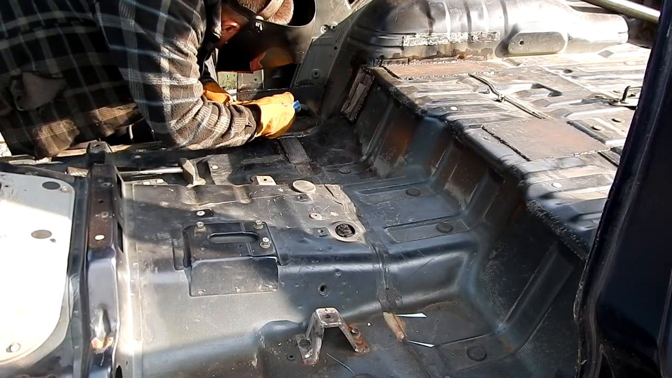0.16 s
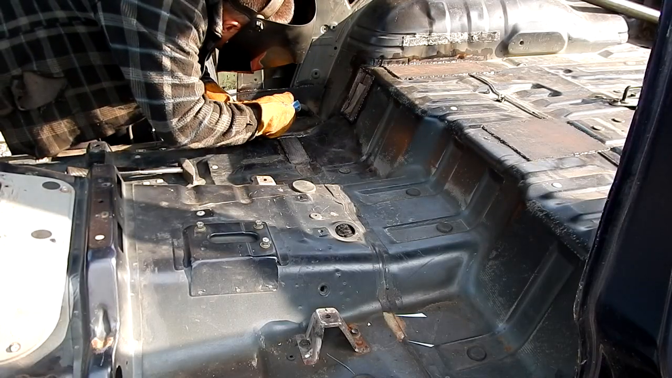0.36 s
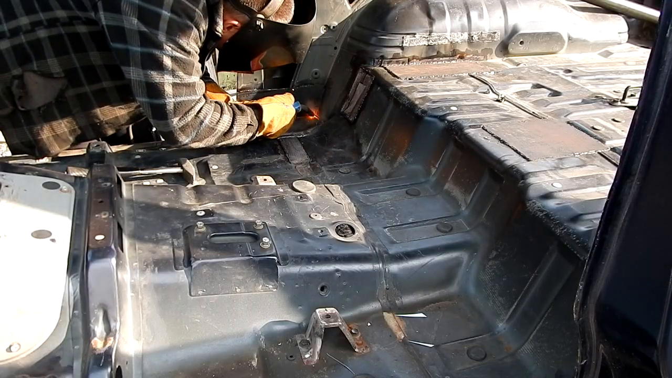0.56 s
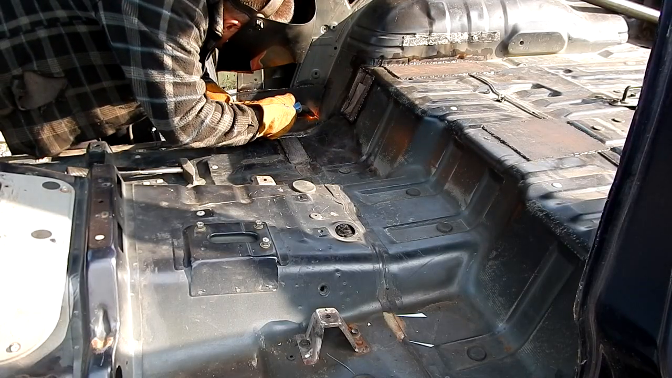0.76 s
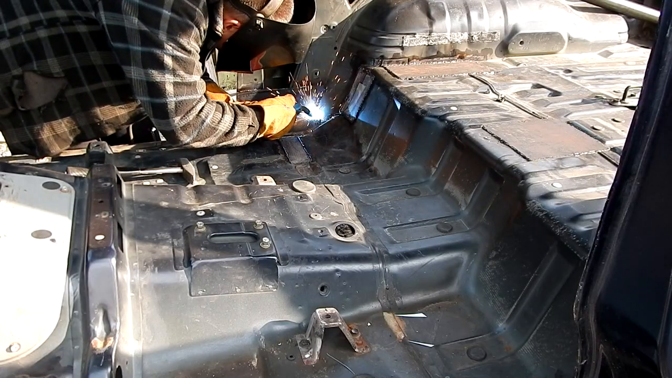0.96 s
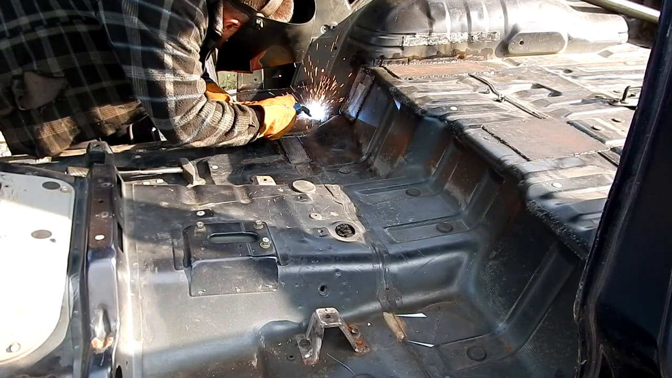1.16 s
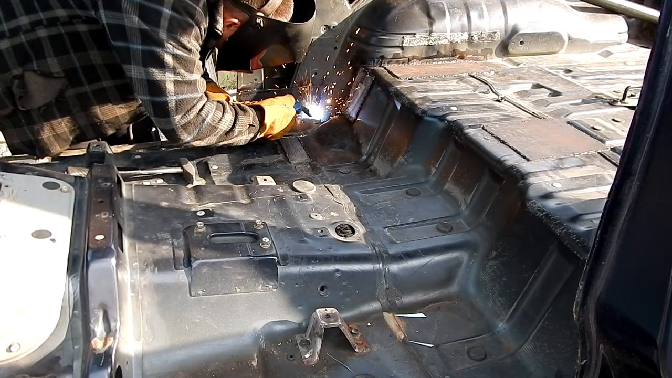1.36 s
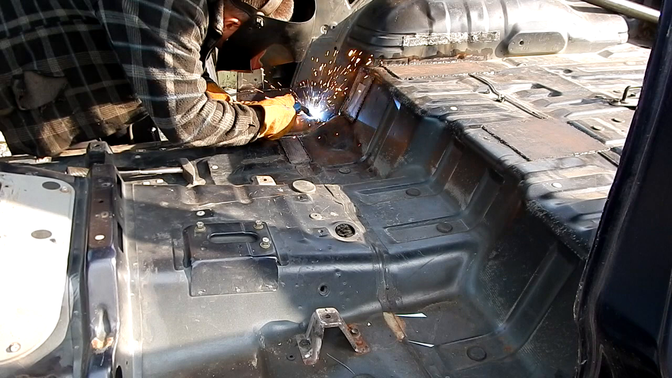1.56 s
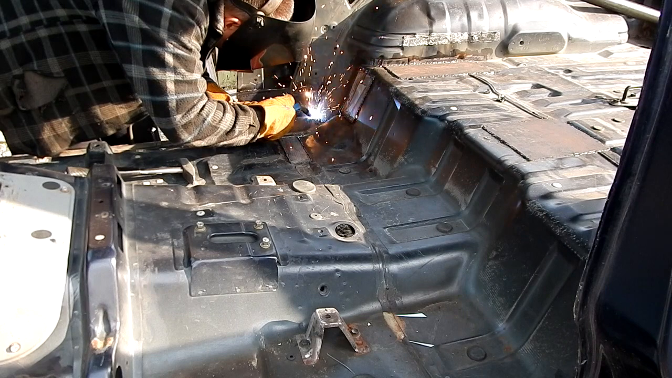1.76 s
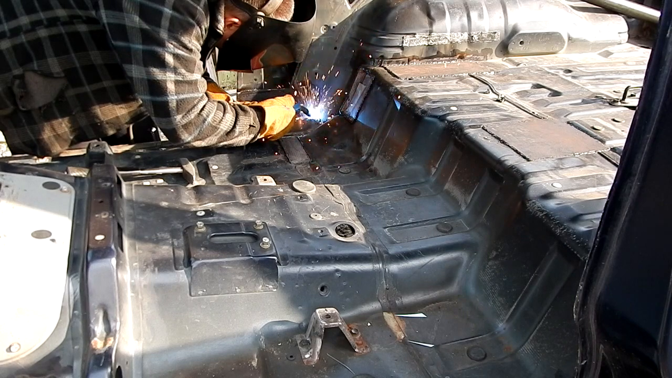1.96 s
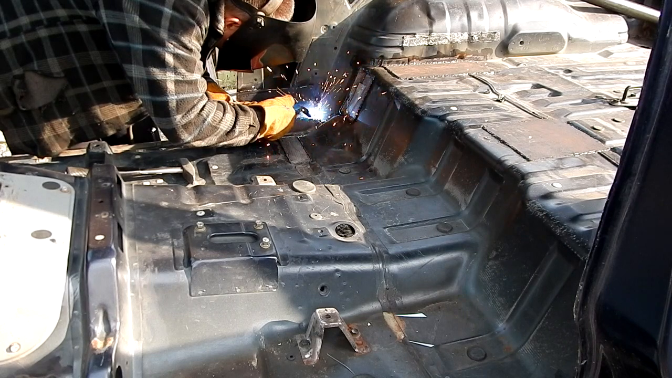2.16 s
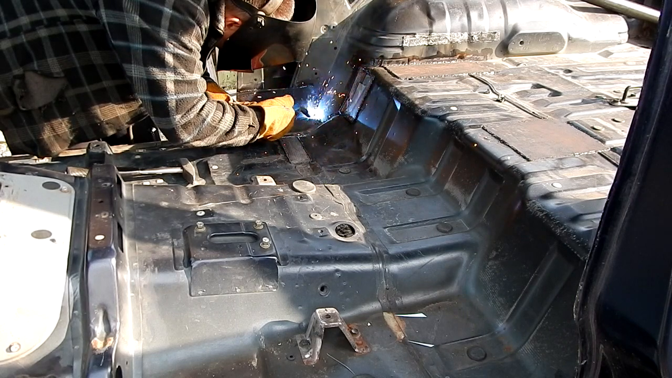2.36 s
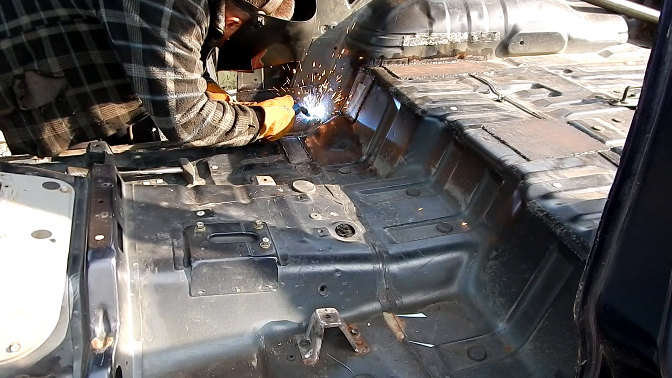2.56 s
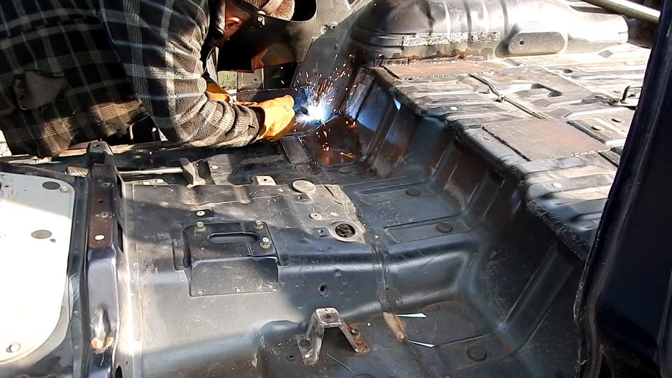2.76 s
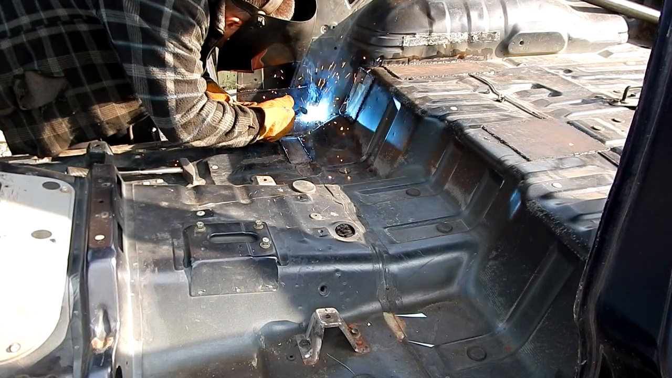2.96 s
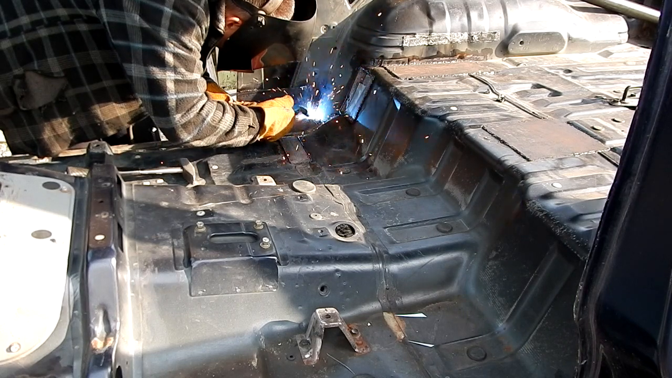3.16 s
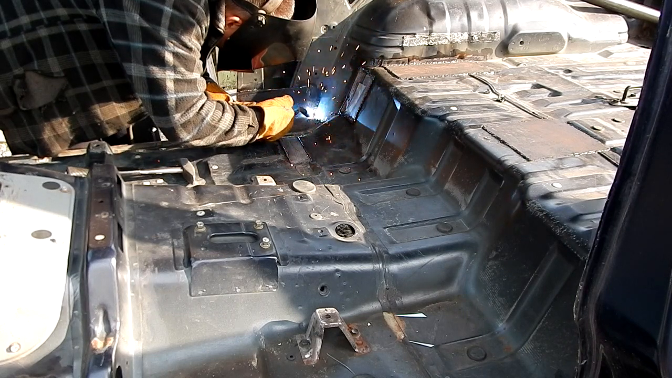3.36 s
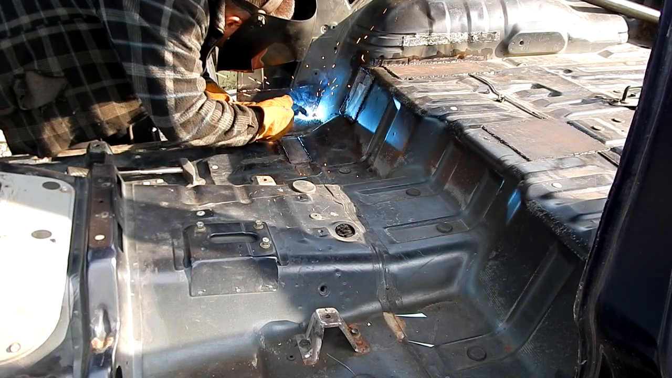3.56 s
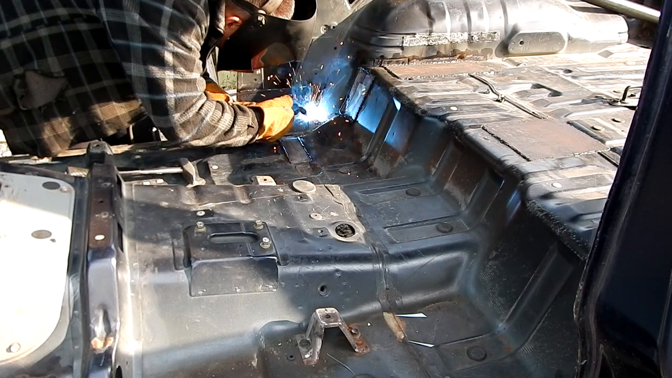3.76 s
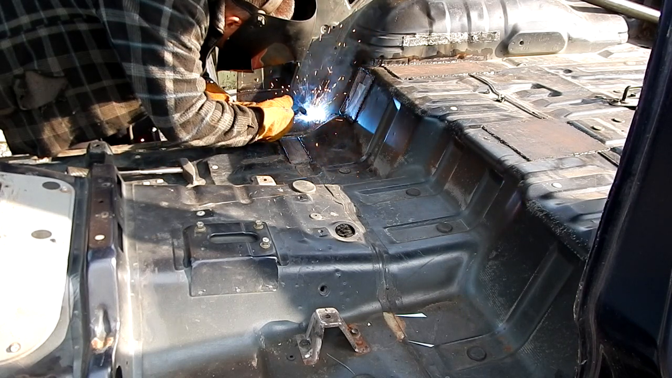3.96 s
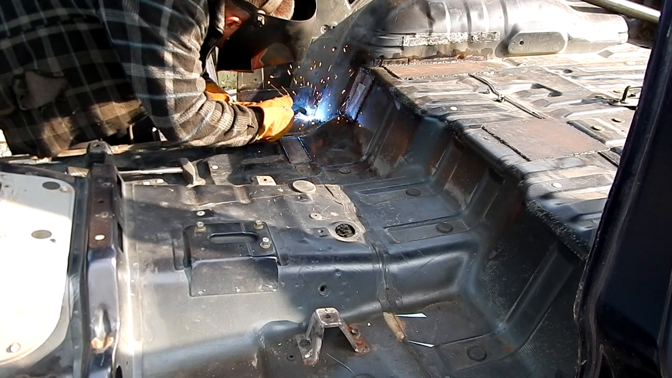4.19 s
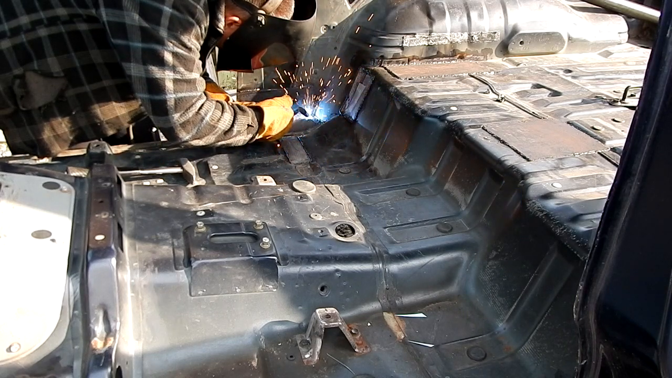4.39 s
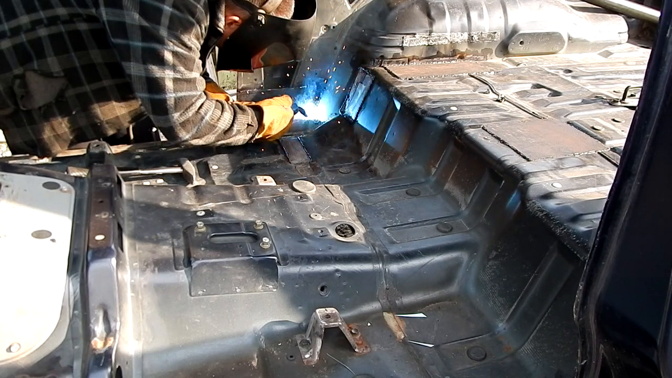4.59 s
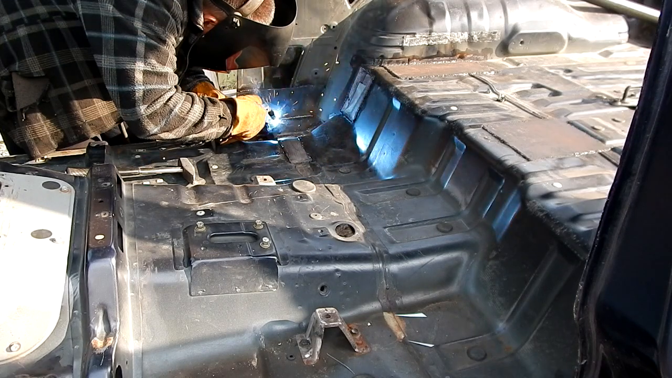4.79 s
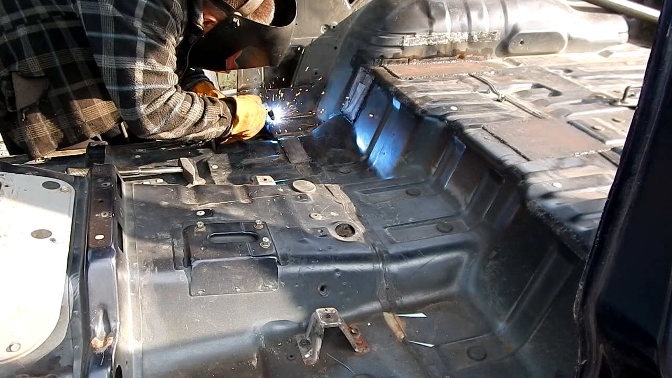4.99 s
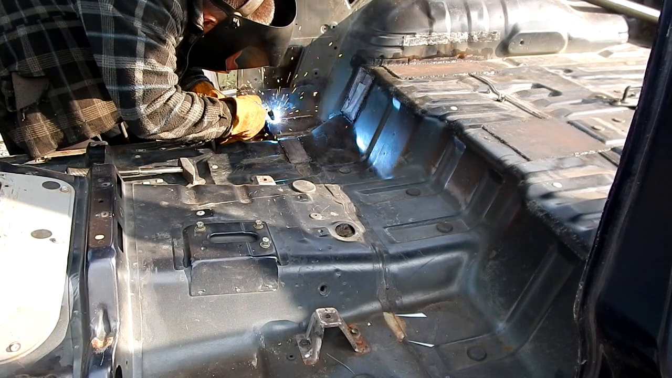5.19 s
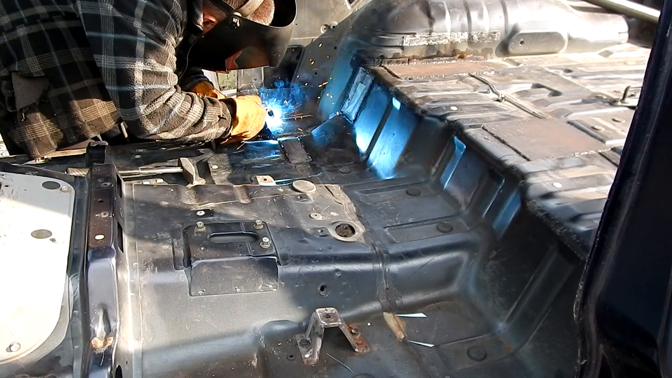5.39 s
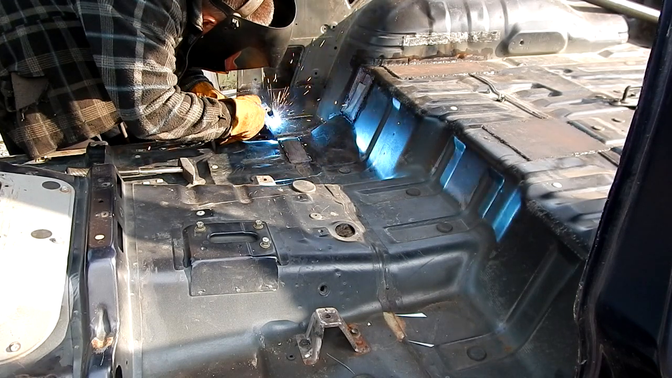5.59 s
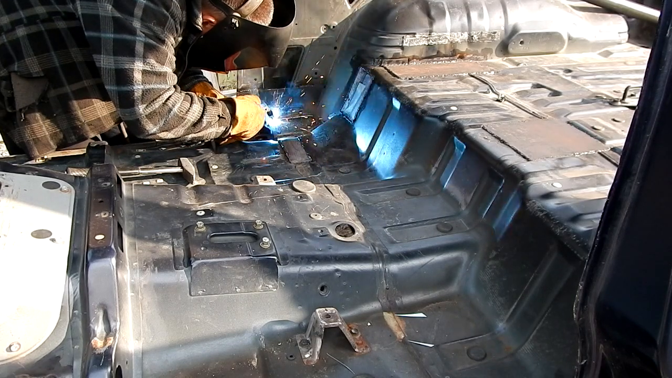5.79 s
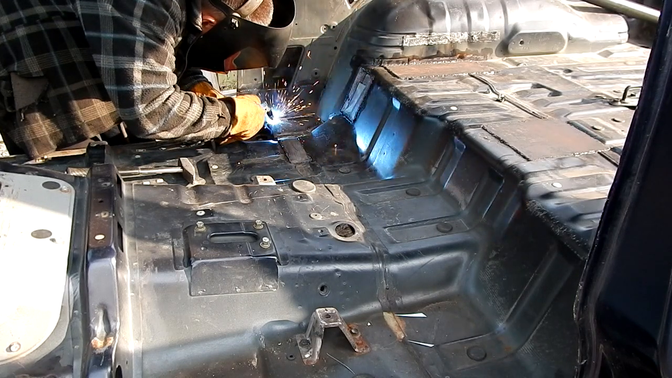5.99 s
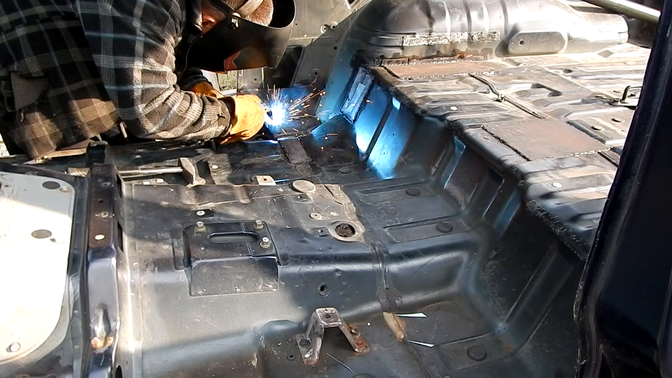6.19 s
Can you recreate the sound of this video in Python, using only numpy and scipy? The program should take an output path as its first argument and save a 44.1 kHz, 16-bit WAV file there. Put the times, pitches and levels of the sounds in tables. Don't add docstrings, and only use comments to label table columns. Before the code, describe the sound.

In a bare metal vehicle shell, cloth rubs and a jolted panel hums softly, then a hard trigger clack releases hissing gas. About a second in, a welding arc catches with fat sharp pops, settling into dense uneven crackle with brief stalls and fine spatter ticks. Near the end an abrupt cut brings a thinner, brighter, more ringing second pass. Close stereo microphone, about two metres away, short metallic reflections.

```python
import sys
import numpy as np
from scipy import signal
from scipy.fft import rfft, irfft
from scipy.io import wavfile
from scipy.ndimage import uniform_filter1d

SR = 44100
rng = np.random.default_rng(int(sys.argv[2]) if len(sys.argv) > 2 else 0)


def int16_out(signal):
    q = np.round(np.clip(np.atleast_2d(signal).T, -1, 1) * 32767)
    wavfile.write(sys.argv[1], SR, q.astype(np.int16))


def ratio(d):
    e = np.asarray(d, float) / 20
    return 10 ** e


N = 275184
T = np.arange(N) / SR
CUT_S = 4.703
STRIKE_S, SETTLES_S = .966, 1.17


def curve(rows, column=1):
    rows = np.array(rows)
    return np.interp(T, rows[:, 0], rows[:, column])


def colour(x, points, size=4096):
    hz, db = np.transpose(points)
    bins_hz = np.arange(size // 2 + 1) * SR / size
    gain = ratio(np.interp(np.log(bins_hz + 1), np.log(hz), db))
    cepstrum = irfft(np.log(gain / np.sqrt(np.mean(gain ** 2))))
    cepstrum[1:size // 2] *= 2
    cepstrum[size // 2 + 1:] = 0
    response = irfft(np.exp(rfft(cepstrum)))
    return signal.fftconvolve(x, response)[:len(x)]


def band(x, hz, width_hz):
    return signal.lfilter(*signal.iirpeak(hz, hz / width_hz, fs=SR), x)


def unit(x):
    return x / np.sqrt(np.mean(x ** 2))


def stereo(mid, side):
    return np.array([mid + side, mid - side])


def hiss(points, apart):
    mid, side = (unit(colour(rng.standard_normal(N), points)) for _ in range(2))
    return stereo(mid, apart * side)


def clicks(times, db):
    return np.bincount(np.minimum((times * SR).astype(int), N - 1), ratio(db), N)


# [t/s, level/dB]
SHOP_LEVEL = [(0, -54), (.5, -55.5), (.56, -67), (1, -68), (6.24, -82.5)]
# [f/Hz, level/dB per Hz]
SHOP_COLOUR = [(200, -11), (300, -7), (450, -22), (2200, -26), (2550, -32), (4200, -27), (4750, -21),
               (5300, -28), (7500, -41.5), (8600, -29), (9500, -48), (12800, -55), (13500, -82)]


def shop_air():
    return ratio(curve(SHOP_LEVEL)) * hiss(SHOP_COLOUR, 0.35)


# [t/s, level/dB]
RUMBLE_LEVEL = [(0, -70), (.12, -53), (.26, -65), (.45, -64), (.58, -74), (1.2, -74), (6.24, -66.5)]
# [f/Hz, level/dB per Hz]
RUMBLE_COLOUR = [(12, -36), (20, -51), (49, -9), (140, -0.5), (201, 1.5), (338, -13), (398, -9), (700, -9),
                 (910, -27), (1540, -120)]


def rumble():
    lumps = ratio(2.5 * unit(uniform_filter1d(rng.standard_normal(N), 1500)))
    return lumps * ratio(curve(RUMBLE_LEVEL)) * hiss(RUMBLE_COLOUR, .45)


# [t/s, level/dB]
GAS_LEVEL = [(0, -100), (.5, -76), (.56, -56.5), (.9, -51), (1.15, -59.5), (6.24, -76)]
# [f/Hz, level/dB per Hz]
GAS_COLOUR = [(300, -34), (1030, -21.5), (1570, -7.5), (2000, -15.5), (2550, -17), (3300, -27), (4500, -13),
              (5100, -13), (5900, -17), (7500, -36), (8600, -29), (9500, -46), (12800, -51), (13500, -90)]


def shielding_gas():
    return ratio(curve(GAS_LEVEL)) * hiss(GAS_COLOUR, 0.17)


# [t/s, f/Hz, level/dB]
PANEL_HUM = [
    (0.0, 331.3, -60.5),
    (0.16, 354, -53.5),
    (0.3, 324, -65),
]


def panel():
    level = ratio(curve(PANEL_HUM, column=2) + 7) * (T < PANEL_HUM[-1][0])
    return level * np.sin(2 * np.pi * np.cumsum(curve(PANEL_HUM)) / SR)


# [t/s, rms level/dB, t60/s, centre f/Hz, width f/Hz]
CLOTH = [
    (0.018, -52, 0.18, 4600, 3300),
    (0.047, -42.5, 0.27, 310, 330),
    (0.049, -45, 0.2, 1760, 900),
    (0.051, -48, 0.17, 5100, 2500),
    (0.472, -43.5, 0.13, 230, 130),
    (0.476, -38, .2, 5400, 4000),
    (0.478, -40, 0.24, 1450, 1900),
]
# [t/s, rms level/dB, t60/s, centre f/Hz, width f/Hz]
CLACKING = [
    (0.488, -34, 0.09, 5700, 2500),
    (.5194, -20, 0.016, 2100, 7100),
    (.5195, -33, 0.11, 6500, 3200),
    (.5196, -24, 0.07, 1600, 1100),
    (.5197, -23, 0.11, 4580, 1200),
    (.92, -35, 0.07, 1100, 1800),
    (0.921, -36, 0.12, 5200, 4500),
    (1.083, -40, .1, 5000, 4600),
    (1.158, -47, .08, 5500, 4600),
]


def scuffs():
    count = N // 4
    out = np.zeros((2, count))
    for rows, attack_s in ((CLOTH, 0.0055), (CLACKING, 0.00034)):
        for s, db, t60, hz, width_hz in rows:
            t = np.maximum(T[:count] - s, 0)
            noise = rng.standard_normal((2, count))
            mid, side = unit(band(band(noise, hz, width_hz), hz, width_hz))
            apart = min(hz / 9000, .8)
            shape = ratio(db - 60 * t / t60) * np.minimum(t / attack_s, 1)
            out += shape * stereo(mid, apart * side)
    return np.pad(out, ((0, 0), (0, N - count)))


# [t/s, peak level/dB]
GAS_BLASTS = [(0.952, -57), (1.18, -59), (1.357, -60), (1.554, -59), (1.81, -63), (1.983, -63),
              (2.182, -60), (2.44, -65), (2.818, -59), (3.073, -61), (3.742, -58), (5.481, -57),
              (5.606, -59)]


def blasts():
    s, db = np.transpose(GAS_BLASTS)
    lag_s = .011
    t = T[:SR // 10]
    push = np.exp(-t / .0022) * np.sin(2 * np.pi * 190 * t)
    return ratio(16.0) * signal.fftconvolve(clicks(s + lag_s, db), push)[:N]


def shell(echoes, modes, ring_db):
    t = T[:SR // 4]
    samples = np.arange(len(t))
    response = np.zeros((2, len(t)))
    for ms, mid, side in echoes:
        nearby = abs(t - ms / 1000) < .001
        image = np.sinc(samples - 8 - ms * SR / 1000) * nearby
        response += np.outer([mid, side], image)
    for hz, width_hz, db in modes:
        decay = np.exp(-np.pi * width_hz * t)
        phase = rng.random((2, 1))
        response += ratio(db + ring_db) * decay * np.sin(2 * np.pi * (hz * t + phase))
    return response


def tail(db, t60, count):
    t = T[:SR // 4]
    noise = rng.standard_normal((count, 2, len(t))) * np.clip(t / 0.0005, 0, 1)
    noise = signal.lfilter(*signal.butter(1, 11000, fs=SR), noise)
    lows = signal.lfilter(*signal.butter(2, 2600, fs=SR), noise)
    highs = noise - lows
    return ratio(db - 60 * t / t60) * highs + ratio(db - 4 - 60 * t / (.7 * t60)) * lows


# [t/s, peak level/dB]
FIRST_PASS = [(0.9657, -10), (0.9792, -12.5), (0.9855, -8.5), (0.9988, -12.5), (1.025, -16),
              (1.0328, -13.5), (1.099, -14), (1.1751, -10.5), (1.1936, -9), (1.2198, -12), (1.2816, -15),
              (1.3685, -12), (1.3782, -11.5), (1.4164, -14), (1.4514, -18.5), (1.4735, -18), (1.5053, -18),
              (1.5688, -12.5), (1.5803, -15.5), (1.5909, -15), (1.6653, -15), (1.7045, -16),
              (1.7827, -17.5), (1.8232, -13), (1.8366, -14.5), (1.9101, -11.5), (1.9961, -13.5),
              (2.1025, -18), (2.1431, -13.5), (2.1957, -11),
              (2.381, -19), (2.3988, -17), (2.4526, -10), (2.4648, -12), (2.481, -16), (2.534, -16),
             (2.5461, -11.5), (2.5943, -13.0), (2.6827, -13.5), (2.7064, -16.5), (2.7488, -17.5),
             (2.8225, -14), (2.8328, -15), (2.9339, -17), (2.941, -14.5), (2.953, -11.5), (2.9975, -14),
             (3.0297, -25.5), (3.0541, -17), (3.0866, -12), (3.1571, -15), (3.1746, -14.5), (3.312, -16),
             (3.4514, -13.5), (3.4597, -11.5), (3.4848, -15.5), (3.531, -19), (3.5533, -16.5),
             (3.574, -14.5), (3.7547, -12.5),
              (3.865, -14.5), (3.936, -20), (3.9466, -16.0), (3.974, -16.5), (4.0396, -12), (4.059, -14.5),
               (4.109, -15.5), (4.1231, -20), (4.13, -10.5), (4.1734, -17), (4.1793, -18), (4.1864, -17.0),
               (4.198, -13.5), (4.2042, -13.5), (4.2226, -13.5), (4.2421, -20), (4.2752, -20.5),
               (4.3102, -16), (4.3206, -13.5), (4.3566, -17.5), (4.3659, -17), (4.386, -15), (4.402, -16),
               (4.4242, -12.5), (4.466, -14), (4.5087, -15.5), (4.5372, -14), (4.5874, -13),
               (4.6052, -13.5), (4.6538, -14)]
# [t/s, peak level/dB]
SECOND_PASS = [(4.7848, -18), (4.8956, -17.5), (4.9852, -19.0), (4.9932, -15.5), (5.0738, -32),
               (5.118, -13), (5.15, -14), (5.168, -17.0), (5.193, -15), (5.2046, -18), (5.2119, -15),
               (5.2318, -17.0), (5.2611, -19.5), (5.3094, -16.5), (5.3532, -18), (5.3593, -13),
               (5.3735, -14.5), (5.4092, -19.5), (5.4682, -15.5), (5.492, -12), (5.5163, -18),
               (5.619, -12.0), (5.7141, -14), (5.8127, -13.5), (6.0837, -15.5), (6.1219, -11.5),
               (6.15, -20), (6.1729, -14), (6.1904, -20), (6.2151, -21.5)]
# [t/s, peak level/dB]
BOUNCES = [
    (2.1975, -16.5),
    (6.12, -16),
]
# [t/s, length/s]
WIRE_STICKS = [(1.032, 0.067), (1.099, 0.076), (1.281, 0.043), (1.473, 0.032), (1.505, 0.033),
               (1.633, 0.032), (1.857, 0.029), (2.029, 0.029), (2.196, 0.032), (2.399, 0.034),
               (2.868, 0.05), (2.997, 0.032), (3.055, 0.032), (3.175, 0.048), (3.389, 0.039), (3.59, 0.027),
               (3.814, 0.043), (3.863, 0.031), (4.809, 0.039), (4.911, 0.032), (5.232, 0.03),
               (5.409, 0.044), (5.517, 0.029), (5.576, 0.028), (5.619, 0.035), (5.654, 0.048),
               (5.756, 0.056), (5.935, 0.046), (6.084, 0.038), (6.122, 0.028)]
# [t/s, level/dB]
ARC_EFFORT = [(.96, -10), (1.3, -16.5), (1.55, -17), (1.8, -20.5), (2.1, -14), (2.35, -16), (2.7, -19.5),
              (3.05, -16.5), (3.3, -19.5), (3.65, -18.5), (4, -16), (4.4, -13.5), (4.68, -15.5),
              (4.72, -21), (5.1, -17), (5.6, -24.5), (5.9, -19.5), (6.24, -22)]


def restrikes():
    shorts_per_s, shortest_s, recovery_s = 60, .005, .005
    scatter_db, stuck_db = 5, -11.5
    fat_s, fat_db = np.transpose(FIRST_PASS + SECOND_PASS + BOUNCES)
    begin, length = np.transpose(WIRE_STICKS)
    edges = np.append(begin, begin + length)

    def clear(when, of):
        return np.abs(when[:, None] - of).min(1) > recovery_s

    wait = -np.log(rng.random((2, 600))).mean(0)
    s = STRIKE_S + np.cumsum(shortest_s + (1 / shorts_per_s - shortest_s) * wait / 1.5)
    free = clear(s, np.append(fat_s, edges)) & (s < T[-1])
    free = np.append(free, clear(edges, fat_s))
    inside = (s[:, None] > begin) & (s[:, None] < begin + length)
    stuck = np.append(inside.any(1), 0 * edges)
    s = np.append(s, edges)
    size = -np.log(rng.random(len(s)))
    cold = 1 + 2 * (s < SETTLES_S)
    db = np.interp(s, *np.transpose(ARC_EFFORT)) - scatter_db * size + stuck_db * stuck * cold
    return clicks(fat_s - .0003, fat_db) + clicks(s[free], db[free])


def spatter(pops):
    ticks = rng.random((700, 2))
    recent = uniform_filter1d(pops ** 2, SR // 25, origin=SR // 51)
    busy = np.sqrt(np.abs(recent)) * 20
    fizz = 20 * ratio(-46) * (T > SETTLES_S)
    return clicks(ticks[:, 0] * T[-1], -12 * ticks[:, 1]) * (busy + fizz)


# [t/s, level/dB]
POOL_FULLNESS = [(1, 3), (1.5, -0.5), (2.5, 0.5), (3.8, 2.5), (4.2, 5), (4.7, 3), (5.2, 2.5), (5.8, 2),
                 (6.2, 4)]
# [f/Hz, level/dB per Hz]
PASS_COLOUR = [
    [(100, -38), (780, -18.5), (960, -14.5), (1300, -10), (2300, -10), (3600, -9.5), (4400, -6),
     (5100, -6.5), (5900, -1.5), (6700, -2), (7500, -22), (8600, -5), (10000, -22.5), (14500, -34)],
    [(100, -42), (420, -20.5), (800, -23), (1350, -9), (2500, -10.5), (3200, -5.5), (4000, -5.5),
     (5000, -0.5), (5800, -0.5), (6800, -3), (8200, -8), (11000, -20.5), (14500, -31)],
]
# [f/Hz, side minus middle level/dB]
SIDE_COLOUR = [(100, 0), (300, -19), (700, -17), (1400, -42), (2600, -39.5), (3600, -14.5), (5000, -11),
               (14000, -9)]
# [t/ms, middle gain, side gain]
PANEL_ECHOES = [
    [(0, 1, .15), (.4, .3, .7), (.7, .25, .5), (2.2, .14, -.3), (5.1, .2, .25), (8.1, .18, -.25)],
    [(0, 1, .15), (.36, .45, -.6), (.72, .3, .4), (1.8, .3, .4), (5.2, .25, -.3), (8.1, .3, .3)],
]
# [f/Hz, width f/Hz, level/dB]
SHELL_MODES = [
    [(430, 160, 12), (973, 48, 0), (2358, 70, -5), (3396, 40, -6), (4097, 35, -2), (4253, 30, -2),
     (4488, 43, -4), (4717, 60, -5), (4837, 54, -5), (5547, 45, -3), (5673, 54, -3), (5860, 50, 2),
     (6072, 45, -3), (6474, 60, -4)],
    [(3570, 60, 3), (4097, 35, 3), (4520, 45, 2), (4688, 40, 0), (4815, 45, 1), (970, 60, 4),
     (5643, 45, -2), (5817, 45, -1), (6091, 50, 2)],
]
# [pop level/dB, side level/dB, tail level/dB, tail t60/s, ring level/dB, spatter level/dB]
PASS_MIX = [
    (8, -6, -29, 0.12, -38.5, -17),
    (8, -3.5, -30, 0.2, -33.5, -18.5),
]


def arc():
    pops = restrikes()
    ticks = spatter(pops)
    chance = np.repeat(rng.standard_normal((N // 128 + 1, 5)), 128, axis=0)[:N].T
    fullness = ratio(curve(POOL_FULLNESS) + 2.5 * chance[0]) - 1
    low = signal.butter(2, 2300, fs=SR)
    out = np.zeros((2, N))
    for k, (pop_db, side_db, tail_db, t60, ring_db, spatter_db) in enumerate(PASS_MIX):
        drive = ratio(pop_db) * (pops + ratio(spatter_db + 7) * ticks)
        drive = drive * ((T > CUT_S) == k)
        drive = drive + signal.lfilter(*low, drive * fullness)
        steady, *moving = tail(tail_db, t60, count=4)
        body = shell(PANEL_ECHOES[k], SHELL_MODES[k], ring_db) + steady
        heard = signal.oaconvolve(drive[None], body)
        for weight, late in zip(chance[1:], moving):
            heard = heard + .3 * signal.oaconvolve((drive * weight)[None], late)
        mid = colour(heard[0, :N], PASS_COLOUR[k])
        side = ratio(side_db) * colour(colour(heard[1, :N], PASS_COLOUR[k]), SIDE_COLOUR)
        side = side + 0.34 * band(mid, 6000, 2160)
        fade = np.clip((T - CUT_S) * (2 * k - 1) / 0.0026, 0, 1)
        out += stereo(mid, side) * fade
    return out


def scene():
    background = shop_air() + rumble() + shielding_gas()
    handling = panel() + scuffs()
    return background + handling + blasts() + arc()


def roll_off(x):
    return signal.sosfilt(signal.butter(12, 15500, fs=SR, output="sos"), x)


# [f/Hz, width f/Hz]
PORT_NOTCHES = [(2510, 220), (5020, 220)]


def record(dry):
    for hz, width_hz in PORT_NOTCHES:
        dry = signal.lfilter(*signal.iirnotch(hz, hz / width_hz, fs=SR), dry)
    rounded = np.tanh(2.5 * dry) / 2.5
    mix = signal.sosfilt(signal.butter(8, 13900, fs=SR, output="sos"), rounded)
    return roll_off(mix)


dry = scene()
out = record(dry)
int16_out(out)
```